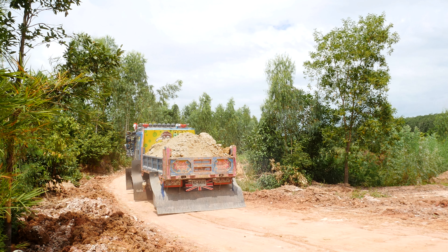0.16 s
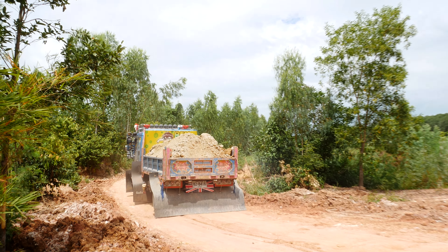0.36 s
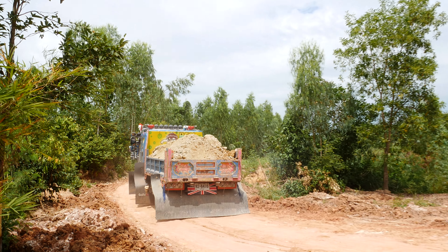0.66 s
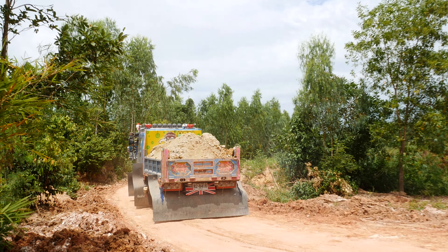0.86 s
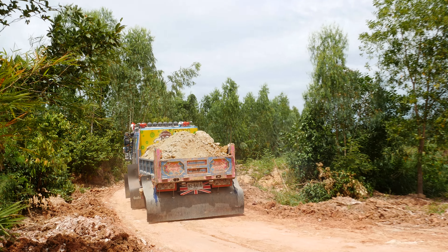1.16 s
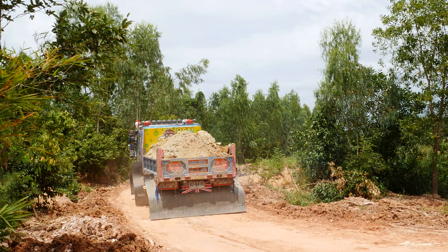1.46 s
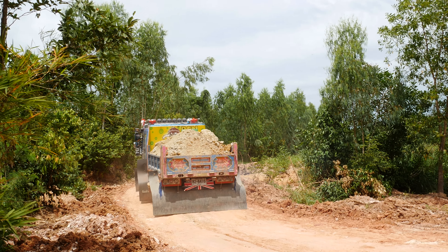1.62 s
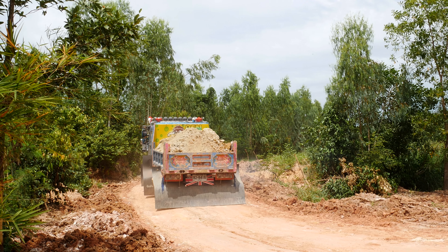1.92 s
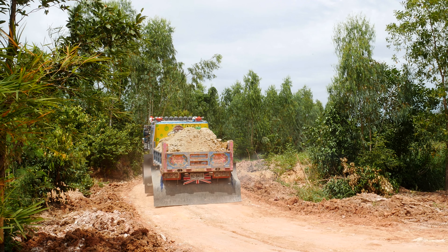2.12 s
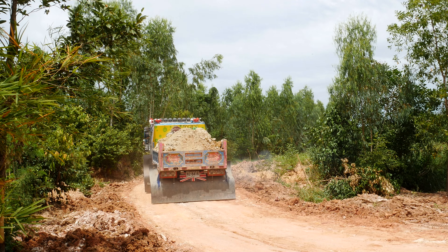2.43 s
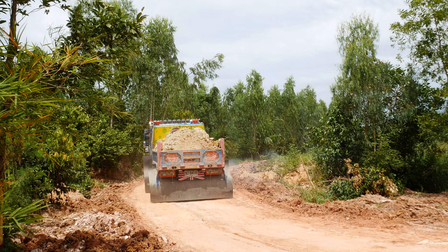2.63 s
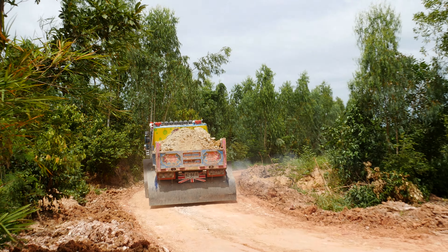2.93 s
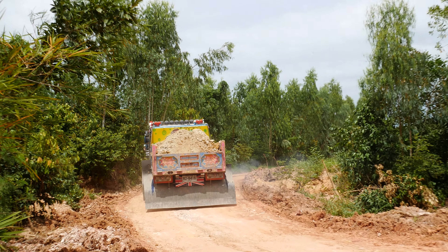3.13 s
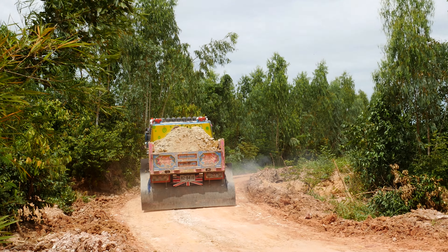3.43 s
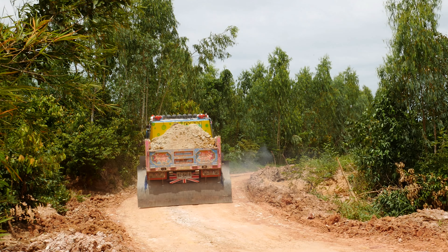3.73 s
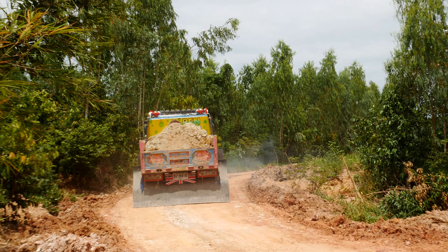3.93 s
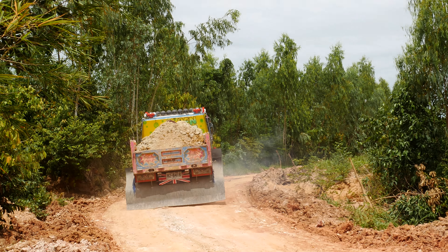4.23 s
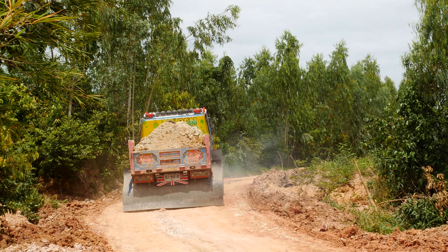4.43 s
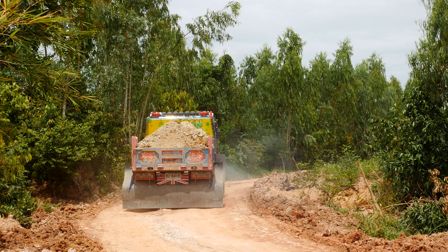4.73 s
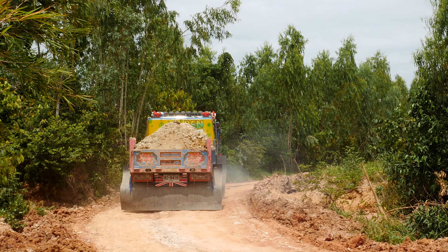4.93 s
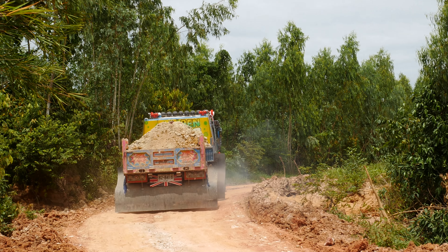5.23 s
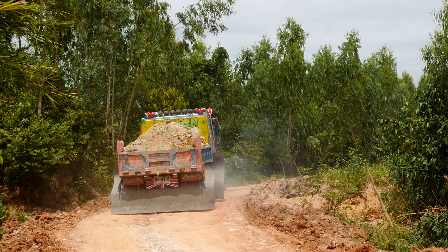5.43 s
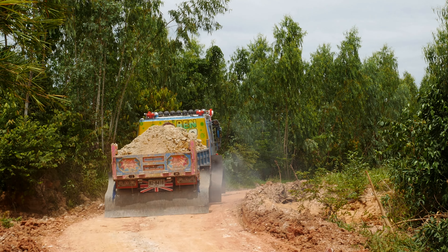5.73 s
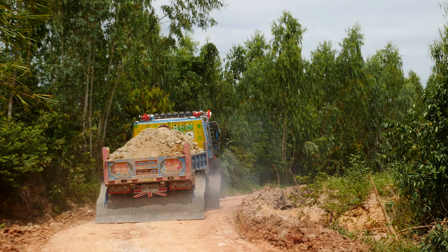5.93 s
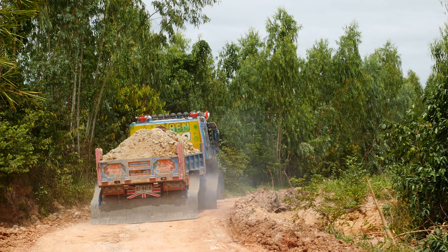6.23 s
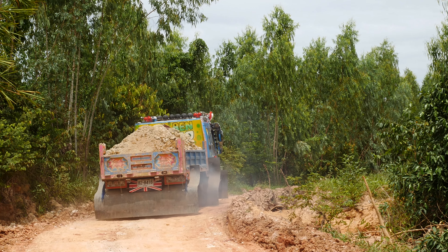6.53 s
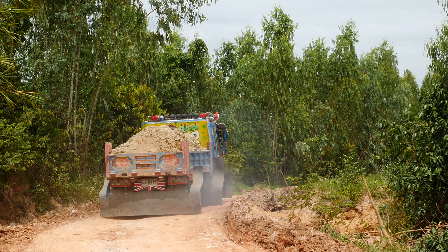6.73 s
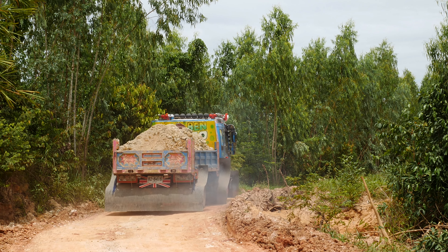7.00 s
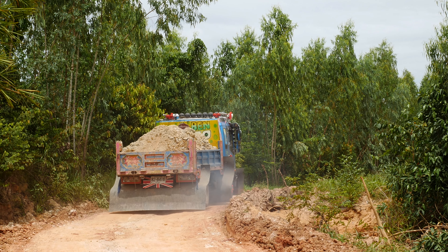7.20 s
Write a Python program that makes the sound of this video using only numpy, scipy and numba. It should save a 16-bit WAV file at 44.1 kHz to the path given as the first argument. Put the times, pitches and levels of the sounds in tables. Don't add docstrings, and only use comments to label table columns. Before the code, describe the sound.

Hoarse pulsing diesel exhaust drone from a heavy truck crawling off between trees, burbling between surges, with hissing spits and rattling growl.

```python
import sys
import numpy as np
from scipy import signal
from scipy.fft import rfft, irfft
from scipy.io import wavfile
from scipy.ndimage import uniform_filter1d, minimum_filter1d
from numba import njit

SR = 44100
rng = np.random.default_rng(int(sys.argv[2]) if len(sys.argv) > 2 else 0)


def materialize(psi):
    bounded = np.clip(np.atleast_2d(psi).T, -1, 1)
    quanta = np.round(bounded * 32767).astype(np.int16)
    wavfile.write(sys.argv[1], SR, quanta)


def makeup_ratio(level_db):
    decades = np.asarray(level_db, float) / 20
    return 10 ** decades


N = 324576
TIME_S = np.arange(N) / SR

# (time [s], uneven burble [dB], firing tone [dB], tail-box ring [dB])
AWAY = [(0, -23, -49, -22), (1.5, -21, -48, -27), (2.2, -23.5, -56, -31), (3.0, -24.5, -45, -32.5),
        (3.4, -28, -55, -40), (4.4, -31.5, -65, -48), (5.5, -30.5, -59, -40), (7.36, -31, -59, -56)]
BOX_OVER_BARK_DB, BOX_FADE_DB_S = 9, 2


def exhaust(crank, ring_db, bark_db):
    burble_db, tone_db, box_db = curves(AWAY)
    box_from_bark_db = uniform_filter1d(bark_db, 1500) + BOX_OVER_BARK_DB - BOX_FADE_DB_S * TIME_S
    box_db = together(box_db + 3.4 * walk(8.9), box_from_bark_db) - ring_db
    firing_hz = uniform_filter1d(np.gradient(crank) * SR, size=2600)
    even = pulses(crank + .11, .6, .00005, depth=.7)
    uneven = pulses(crank, 3.5, .003, per=2)

    rough = np.minimum(makeup_ratio(2 * (burble_db - ring_db)), 1)
    clean = svf(svf(even, 3 * firing_hz, 14.1), 3 * firing_hz, 90.0)
    second = makeup_ratio(-15.5) * np.cos(4 * np.pi * crank)
    burble = ring(uneven, [(107.6, 8.4, -4.5), (179.9, 56, 1), (371.5, 75, -11.0)], order=2)
    pipe = np.sqrt(1 - rough ** 2) * (level(clean) + second) + rough * level(burble)

    box = svf(svf(1.13 * even + .5 * uneven, 4 * firing_hz, 20.0), 4 * firing_hz, 30.0)
    box = level(box, -3.5) * makeup_ratio(np.minimum(box_db, 5.0))
    tone = np.sqrt(2) * np.sin(2 * np.pi * crank)
    return makeup_ratio(ring_db) * (pipe + box) + makeup_ratio(tone_db) * tone


# (time [s], length [s], level [dB], sag over the length [dB])
SINGS = [(0, .04, -18, 4.5), (0.129, 0.073, -21, 0), (0.256, .17, -17.5, 2), (0.505, 0.11, -23.5, 2),
         (0.647, .23, -15, 4), (1.102, .05, -18, 1), (1.512, .19, -14.5, 4.5), (1.862, .08, -19.5, 1),
         (1.959, .4, -14, 5.5), (2.522, .21, -18.5, 1.5), (3.076, .37, -12, 10), (3.612, 0.46, -13, 7.5),
         (4.003, .39, -14.5, 4), (4.469, 0.3, -18.5, 3.5), (4.576, .31, -13.5, 5), (5.028, .09, -20, -1),
         (5.122, .16, -12.5, 10.5), (5.344, 0.0547, -24.5, 0.5), (5.487, 0.12, -19, 3.5),
         (5.582, .19, -15, 3.5), (5.925, 0.11, -19.5, 0), (6.033, .21, -13, 9), (6.271, 0.13, -20, 0),
         (6.369, .27, -13, 6.5), (6.817, 0.068, -20, -1), (6.88, .26, -14.5, 5), (7.253, 0.17, -21.5, -8)]
SING_ATTACK_S, SING_RELEASE_DB_S = .02, 268.5


def singing():
    pushes = []
    for start, length, db, sag in SINGS:
        since = TIME_S - start
        rise = 20 * np.log10(np.clip(since / SING_ATTACK_S, 1e-4, 1))
        release = SING_RELEASE_DB_S * np.maximum(since - length, 0)
        pushes.append(db - sag * np.clip(since / length, 0, 1) - release + rise)
    return together(np.max(pushes, axis=0), curves(AWAY)[0])


# (resonance [Hz], width [Hz], level [dB])
BARK = [(376, 73, 8), (554, 280, 5.5), (880, 645, -5.5)]
# (resonance [Hz], width [Hz], level [dB])
EDGE = [(1020, 920, -0.5), (2160, 1430, 2.5), (2650, 1700, -3)]


def barks(crank, bark_db, edge_db):
    front = -pulses(crank - .09, 1.4, .00003, depth=1.5 - 1.0 * hardness(edge_db))
    bark = ring(front * makeup_ratio(bark_db), BARK, order=2) * makeup_ratio(0.5)
    return bark + ring(front * makeup_ratio(edge_db), EDGE, order=2) * makeup_ratio(2.5)


# (time [s], length [s], bark level [dB], bark edge level [dB])
FUEL = [(0.207, 0.33, -44, -59.5), (0.649, .17, -20, -52), (1.484, .13, -34, -50),
        (1.924, .28, -26.5, -54.5), (2.463, .25, -38.5, -52.5), (3.094, .295, -29, -38.5),
        (3.615, 0.092, -23, -50), (3.638, .295, -30, -37), (3.9, .13, -28, -49.5), (3.997, 0.17, -24, -38),
        (4.088, .2, -25, -34), (4.264, .1, -29, -37.5), (4.583, .245, -24.5, -40),
        (4.978, 0.12, -40.5, -62), (5.088, .12, -30, -66), (5.54, 0.21, -34.5, -57.5),
        (5.992, 0.1, -30.5, -69), (6.324, 0.24, -27, -54), (6.881, .205, -20.5, -45.5),
        (7.269, 0.14, -38.5, -52.5)]
IDLE_BARK_DB, IDLE_EDGE_DB = -54, -74.5
TURN_S = .052
BARK_EARLY_DB, EDGE_EARLY_DB = 9, 14
BARK_SAG_DB, EDGE_FADE_DB, EDGE_FADE_S = 9.5, 11.5, .08


def fuel():
    bark_db, edge_db = np.full(N, 1. * IDLE_BARK_DB), np.full(N, 1. * IDLE_EDGE_DB)
    for start, length, bark, edge in FUEL:
        on = (TIME_S >= start) & (TIME_S < start + length)
        since = TIME_S[on] - start
        early = since < TURN_S
        fade = np.clip(1 - (length - since) / EDGE_FADE_S, 0, 1)
        bark_now = bark - BARK_SAG_DB * since / length - BARK_EARLY_DB * early
        edge_now = edge - EDGE_EARLY_DB * early - EDGE_FADE_DB * fade
        bark_db[on] = np.maximum(bark_db[on], bark_now)
        edge_db[on] = np.maximum(edge_db[on], edge_now)
    return bark_db, edge_db


def hardness(edge_db):
    return np.clip((edge_db + 56) / 20, 0, 1)


# (time [s], firings counted [1])
CRANK = [(0.0, -34.8), (0.721, 3), (1.53, 45), (2.028, 72), (2.529, 99), (3.15, 132), (3.354, 144),
         (3.645, 159), (3.952, 177), (4.26, 195), (4.42, 203.9), (4.49, 207.3), (4.7, 219), (5.144, 243),
         (6.046, 291), (6.435, 312), (6.992, 342), (7.36, 361.8)]
PULL, HARD_PULL = .13, .125
FLYWHEEL_S = .055
SWING_S, OUTSIDE_SHARE = (3.0, 4.4), .3


def crankshaft(ring_db, edge_db):
    fuelled = np.clip((ring_db - curves(AWAY)[0] - 1) / 4, 0, 1)
    fuelled = -minimum_filter1d(-fuelled, size=1800)
    hard = uniform_filter1d(hardness(edge_db), int(2 * FLYWHEEL_S * SR))
    hard = np.roll(hard, int(FLYWHEEL_S * SR / 3))
    swinging = np.abs(TIME_S - np.mean(SWING_S)) < np.ptp(SWING_S) / 2
    hard = hard * np.where(swinging, 1, OUTSIDE_SHARE)
    turned = np.cumsum(1 + PULL * uniform_filter1d(fuelled, size=1500) + HARD_PULL * hard)
    s, count = np.transpose(CRANK)
    marks = np.interp(s * SR, np.arange(N), turned)
    speed = np.gradient(np.interp(turned, marks, count))
    return count[0] + np.cumsum(uniform_filter1d(speed, size=1200))


CYLINDER_DB = [0, -4, -6, -.5, -4, -6.5]


def pulses(crank, scatter_db, jitter_s, per=1, depth=1):
    count = np.floor(crank * per).astype(int)
    at = np.flatnonzero(np.diff(count)) + 1
    chance = rng.standard_normal((2000, 2)).clip(-2, 2)[:len(at)]
    cylinder_db = np.take(CYLINDER_DB, count[at] // per, mode="wrap")
    size = makeup_ratio(np.broadcast_to(depth, N)[at] * cylinder_db + scatter_db * chance[:, 0])
    late = (jitter_s * SR * chance[:, 1]).astype(int)
    out = np.zeros(N)
    np.add.at(out, np.clip(at + late, 0, N - 1), size)
    return out


# (time [s], level [dB], centre [Hz], width [Hz], hold [s])
JETS = [
    (3.154, -49.5, 4200, 2190, 0.25),
    (3.249, -36, 4140, 2240, 0.075),
    (3.265, -42.5, 9100, 4730, 0.06),
    (3.694, -40.5, 4230, 2100, 0.2),
    (3.791, -46, 9200, 4500, 0.048),
    (4.06, -45, 4140, 2300, 0.23),
    (4.159, -34, 4080, 2220, 0.033),
    (4.161, -38, 9100, 4560, 0.023),
    (4.654, -53, 4150, 2210, 0.075),
]
# (time [s], peak level [dB])
SPITS = [
    (3.251, -28),
    (3.7817, -29.5),
    (3.7968, -15),
    (4.147, -36),
    (4.1614, -15.5),
    (4.177, -27.5),
    (6.0883, -40),
]


def jets(crank):
    out, t = np.zeros((2, N)), np.arange(12000) / SR
    for (s, db, hz, width, hold), noise in zip(JETS, rng.standard_normal((len(JETS), 2, 12000))):
        mid, side = (level(band(band(v, hz, width), hz, 1.1 * width)) for v in noise)
        envelope = makeup_ratio(db) * np.exp(-np.maximum(t - hold, 0) / 0.027)
        start = int(s * SR)
        out[:, start:start + 12000] += envelope * np.array([mid + 0.2 * side, mid - .3 * side])
    out = out * (0.8 + 1.03 * np.exp(-(crank % 1) / 0.15))
    spit = np.zeros(N)
    for (s, db), noise in zip(SPITS, rng.standard_normal((len(SPITS), 600))):
        start = int(s * SR)
        spit[start:start + 600] += makeup_ratio(db) * noise * np.exp(-t[:600] / 0.0014)
    return out + 0.87 * band(band(spit, 9200, 7000), 9200, 9600)


# (time [s], level [dB])
GEAR = [(0, -41.5), (.4, -48), (.6, -42), (.9, -45), (1.35, -38), (1.65, -46.5), (1.88, -42.5),
        (2.3, -49.5), (2.7, -45), (3.0, -41), (3.55, -45), (4.0, -45), (4.45, -51.5), (5.0, -52.5),
        (5.6, -49.5), (6.3, -46.5), (6.7, -48), (7.36, -50)]
# (frequency [Hz], level per Hz [dB])
MACHINE = [(140, 13), (240, -23.5), (271, 4), (432, 5.5), (590, -1.5), (849, -6), (992, -6.5), (1400, -16),
           (2320, -19), (2520, -22), (6650, -38), (10300, -36.5), (15000, -50)]
# (frequency [Hz], side minus mid [dB])
WIDTH = [(60, -9), (110, -5), (200, -13), (380, -17.5), (690, -24.5), (1280, -6.5), (2350, -11),
         (4330, -11.5), (7980, -11), (14700, -4)]
# (low edge [Hz], high edge [Hz])
ZONES_HZ = [(300, 1300), (1500, 3500), (5000, 14000)]
# (resonance [Hz], width [Hz], level [dB])
GROWL = [(282, 260, -16.5), (389, 44, -0.5), (522.7, 80, 10.5), (614, 30, 5), (822, 180, -3),
         (1082, 62, -5)]
# (resonance [Hz], width [Hz], level [dB])
TAPPETS = [(975, 90, 0), (1300, 100, 3), (1650, 160, -1), (2270, 90, -2), (2900, 300, -1.5),
           (4300, 200, -13)]
RUMBLE_DB, HISS_DB = 10.5, -4.5
HISS_FADE_DB_S, HISS_DUCK_DB, TAP_RISE_DB_S = 1.17, 3, 1.4
RUMBLE_OVER_BARK_DB, CLATTER_OVER_EDGE_DB, GROWL_OVER_EDGE_DB = -3, -2, 4


def machine(crank, bark_db, edge_db):
    f = np.fft.rfftfreq(N, 1 / SR)
    gear_db = curves(GEAR)[0]
    bark, edge = uniform_filter1d([bark_db, edge_db], 1500)
    rumble_db = together(gear_db + RUMBLE_DB, bark + RUMBLE_OVER_BARK_DB, edge + GROWL_OVER_EDGE_DB)
    clatter_db = together(gear_db, edge + CLATTER_OVER_EDGE_DB)
    hiss_db = gear_db / 2 - 22.5 + HISS_DB - HISS_FADE_DB_S * TIME_S

    locked = uniform_filter1d(np.clip((bark_db + 46) / 10, 0, .98), 1500)
    body = ring(pulses(crank - .12, .5, .00003, depth=.4), GROWL, order=2)
    growl = makeup_ratio(rumble_db + 1.5) * locked * body
    rumble_db = rumble_db + 10 * np.log10(1 - locked ** 2)
    clatter_db = clatter_db - 2.5 * locked
    hiss_db = hiss_db - HISS_DUCK_DB * locked

    mid, side = rfft(rng.standard_normal((2, N))) * makeup_ratio(shape(MACHINE, f))
    side = side * makeup_ratio(shape(WIDTH, f) + 0.5)
    zones = []
    for db, (lo, hi) in zip((rumble_db, clatter_db, hiss_db), ZONES_HZ):
        rms = np.sqrt(2 * np.sum(np.abs(mid[(f > lo) & (f < hi)]) ** 2)) / N
        zones.append(db - 20 * np.log10(rms))

    puff = np.exp(-(crank % 1) / 0.44)
    puff = 1 + 0.44 * (puff - puff.mean())
    centres = np.log2([600, 2300, 6500])
    out, swell = 0, walk(4.9)
    for octave in np.arange(7.5, 14.1, .5):
        mask = np.cos(np.pi * np.clip(np.log2(f + 1) - octave, -.5, .5)) ** 2
        share = [np.interp(octave, centres, row) for row in np.eye(3)]
        zone_db = sum(w * db for w, db in zip(share, zones))
        gain = makeup_ratio(zone_db + .7 * swell + 1.5 * walk(18))
        m, s = irfft(np.array([mid, side]) * mask, N)
        out = out + gain * puff * np.array([m + s, m - s])

    taps = pulses(crank, 3.5, .0015, per=4) * makeup_ratio(3.5 * walk(14) + TAP_RISE_DB_S * TIME_S)
    ticks = level(ring(taps, TAPPETS, order=2), -1)
    return out + growl + makeup_ratio(clatter_db) * ticks


def thump():
    return makeup_ratio(-26) * np.exp(-((TIME_S - 1.961) / 0.0033) ** 2)


def trees(x):
    t = np.arange(9000) / SR
    echoes = rng.standard_normal((2, 9000)) * np.exp(-t / .05) * (t > .004)
    echoes = echoes / np.sqrt(np.sum(echoes ** 2, axis=1, keepdims=True))
    return signal.fftconvolve(x[None], echoes, axes=1)[:, :N]


def breeze():
    return level(band(rng.standard_normal(N), 75, 50), -51) * np.array([[1], [-1]])


def ring(x, table, order=1):
    kernel = 0
    for k, (hz, width, db) in enumerate(table):
        one = signal.unit_impulse(4096)
        for _ in range(order):
            one = band(one, hz, width)
        kernel = kernel + (-1) ** k * makeup_ratio(db) * one
    return signal.fftconvolve(x, kernel)[:N] / np.sqrt(55 * np.sum(kernel ** 2) / SR)


def band(x, hz, width):
    return svf(x, np.full(len(x), 1. * hz), 1. * width)


@njit
def svf(x, hz, width):
    y, b, l = np.empty(len(x)), 0., 0.
    for i in range(len(x)):
        g, k = np.tan(np.pi * hz[i] / SR), width / hz[i]
        v = (b + g * (x[i] - l)) / (1 + g * (g + k))
        b, l, y[i] = 2 * v - b, l + 2 * g * v, k * v
    return y


def walk(rate):
    k = int(SR / rate)
    held = np.repeat(rng.standard_normal(N // k + 1), k)
    return 1.37 * uniform_filter1d(uniform_filter1d(held, k), k)[:N]


def level(x, db=0):
    return x * makeup_ratio(db) / np.sqrt(np.mean(x ** 2))


def together(*db):
    return 20 * np.log10(np.sqrt(sum(makeup_ratio(d) ** 2 for d in db)))


def curves(table):
    s, *columns = np.transpose(table)
    return [np.interp(TIME_S, s, c) for c in columns]


def shape(table, hz):
    f, value = np.transpose(table)
    return np.interp(np.log(hz + 1), np.log(f), value)


def scene():
    ring_db = singing()
    bark_db, edge_db = fuel()
    crank = crankshaft(ring_db, edge_db)
    note = exhaust(crank, ring_db, bark_db)
    bark = barks(crank, bark_db, edge_db)
    echo = trees(makeup_ratio(-23) * note + makeup_ratio(-14) * bark)
    return note + bark + thump() + echo + jets(crank) + machine(crank, bark_db, edge_db) + breeze()


def band_limit(x):
    return signal.sosfilt(signal.butter(12, 15310, fs=SR, output="sos"), x)


# (frequency [Hz], left minus right [dB])
LEAN = [(60, 1.5), (160, .5), (700, 2), (1280, 3), (2350, -3.5), (4330, 1.6), (8000, 0.5), (14000, 2)]


def record(dry):
    f = np.fft.rfftfreq(N, 1 / SR)
    lean = makeup_ratio(shape(LEAN, f) / 2 * np.array([[1], [-1]]))
    hole = 1 - .97 * np.exp(-((f - 7860) / 75) ** 2)
    x = irfft(rfft(dry) * lean * hole * (f < 15300), N)
    x = signal.sosfilt(signal.butter(2, 40, "high", fs=SR, output="sos"), x)
    return band_limit(x)


dry = scene()
out = record(dry)
materialize(out)
```